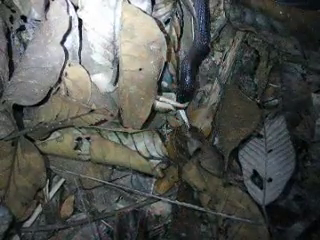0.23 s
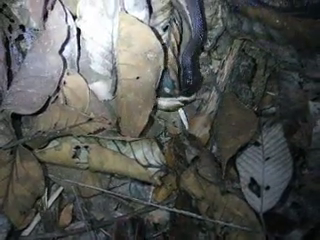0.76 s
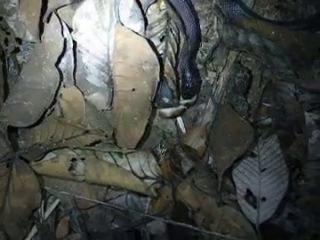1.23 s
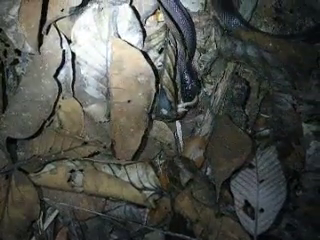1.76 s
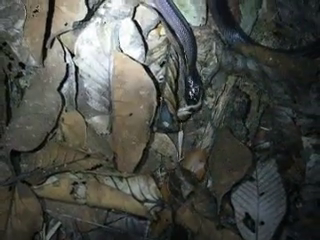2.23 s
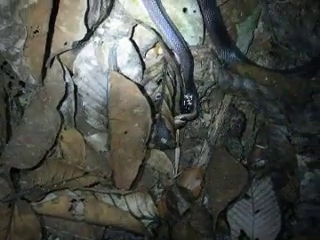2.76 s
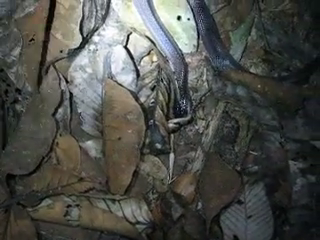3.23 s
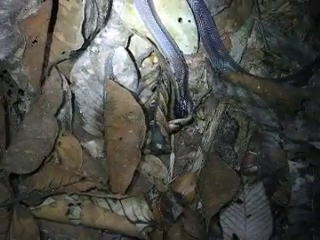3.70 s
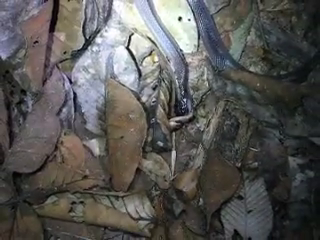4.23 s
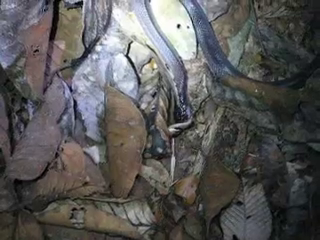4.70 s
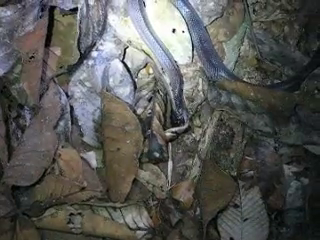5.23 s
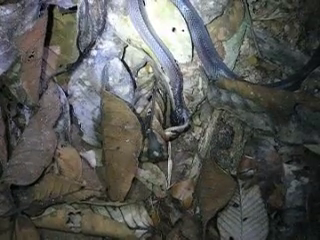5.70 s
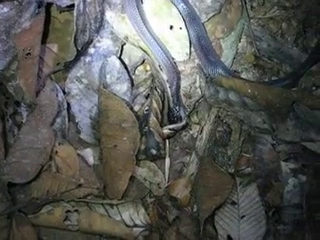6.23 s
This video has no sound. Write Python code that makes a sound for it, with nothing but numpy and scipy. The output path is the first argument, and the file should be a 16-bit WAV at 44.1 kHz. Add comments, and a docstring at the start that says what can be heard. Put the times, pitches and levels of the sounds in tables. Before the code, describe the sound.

Dry leaves crackle and click close by, then settle, under a steady, high chorus of night crickets in a forest.

```python
"""Night in a rainforest, heard from a hand-held camera close to the fallen leaves.
From the start, air hisses, the camera's motor whines on the right and far insects and frogs hum.
Crickets rub their wings: a crowd throbs near 5.9 kHz while others trill in turns near 4.5 kHz.
Dry leaves rustle and snap, mostly on the right, and calm down after three seconds.
Short chirps come now and then from about one second on; near six seconds a katydid starts to rasp."""
import sys
import numpy as np
from scipy import signal
from scipy.fft import rfft, irfft
from scipy.io import wavfile
from scipy.ndimage import uniform_filter1d

SR = 44100
rng = np.random.default_rng(int(sys.argv[2]) if len(sys.argv) > 2 else 0)


def master_out(mix):
    """Clip the mix to full scale and print it as 16-bit PCM to the path in sys.argv[1]."""
    frames = np.transpose(np.atleast_2d(mix))
    ceiling = np.clip(frames, -1, 1)
    pcm = np.round(ceiling * 32767).astype(np.int16)
    wavfile.write(sys.argv[1], SR, pcm)


N = 284743
T = np.arange(N) / SR
FREQS = np.maximum(np.fft.rfftfreq(N, 1 / SR), 1)


def undb(db):
    """Turn decibels into a gain."""
    return 10 ** (np.asarray(db) / 20)


def pan(db):
    """Gains for the two ears, the left one louder by db."""
    return undb(np.array([[db / 2], [-db / 2]]))


def unit(x):
    """Scale a sound to an average (rms) size of 1."""
    return x / np.sqrt(np.mean(np.abs(x) ** 2))


def wander(per_s):
    """A smooth random curve for each ear, about 1 in size."""
    step = int(SR / per_s)
    held = np.repeat(rng.standard_normal((2, N // step + 1)), step, axis=1)
    return unit(uniform_filter1d(uniform_filter1d(held, step), step)[:, :N])


def swell(start_s, end_s, fade_s):
    """A gain that fades in around start_s and out around end_s."""
    inside_s = np.minimum(T - start_s, end_s - T)
    return np.sin(np.pi / 2 * np.clip(inside_s / fade_s + .5, 0, 1)) ** 2


def band(x, low_hz, high_hz):
    """Keep the part of a sound between two pitches."""
    return signal.sosfilt(signal.butter(2, [low_hz, high_hz], "band", fs=SR, output="sos"), x)


def noise(spectrum, likeness):
    """Shaped noise; likeness runs from 0 (the ears are unrelated) to 1 (both hear the same)."""
    mid, side = rfft(rng.standard_normal((2, N))) * spectrum
    mid, side = mid * np.sqrt((1 + likeness) / 2), side * np.sqrt((1 - likeness) / 2)
    return irfft(np.array([mid + side, mid - side]), N)


def noise_around(pitch_hz, width_hz, likeness):
    """Noise gathered around one pitch."""
    spectrum = 1 / (1 + (2 * (FREQS - pitch_hz) / width_hz) ** 4) ** .67
    return unit(noise(spectrum, likeness))


def air():
    """Still air and the microphones hiss over a low, wavering murmur."""
    # tone of the hiss: pitch_hz, level_db (per Hz), likeness
    hiss_tone = [(20, -115, 0), (60.6, -104, 0.26), (141, -99, 0.08), (400, -97.5, 0.3), (790, -95, 0.78),
                 (1520, -101, 0.3), (2460, -101, 0.22), (3530, -95, 0.08), (4800, -85, 0), (6420, -94.5, 0),
                 (7400, -103, 1), (9940, -107, 0), (13300, -110, 0.1), (16000, -120, 0.1)]
    # loudness of the murmur: time_s, level_db
    murmur_levels = [(0.0, -71), (0.21, -74), (1.33, -68), (2.27, -73.5), (3.9, -71), (4.13, -73),
                     (6.28, -73), (6.46, -72)]
    hz, db, likeness = np.transpose(hiss_tone)
    spectrum = undb(np.interp(np.log(FREQS), np.log(hz), db)) * np.sqrt(SR / 2)
    hiss = noise(spectrum, np.interp(np.log(FREQS), np.log(hz), likeness))
    hiss *= undb(1.44 * wander(per_s=5.05)[0])
    murmur_db = np.interp(T, *np.transpose(murmur_levels)) + 2.5 * wander(per_s=5)[0]
    return hiss + undb(murmur_db) * noise_around(320, width_hz=336, likeness=.87)


def motor_whine(pitch_hz=8263, restarts_per_s=30, first_restart_s=.0012, left_db=-75, right_db=-57.5):
    """The camera motor's tone keeps starting afresh; the casing dulls what lies above it."""
    since_restart_s = (T - first_restart_s) % (1 / restarts_per_s)
    tone = np.sin(2 * np.pi * pitch_hz * since_restart_s)
    return unit(band(tone, 7900, 8270)) * undb([[left_db], [right_db]])


def far_chorus():
    """Far insects and frogs blur into bands of noise that swell slowly and flicker."""
    # singers that never stop: pitch_hz, width_hz, level_db, left_minus_right_db, likeness
    steady_singers = [(443.3, 35, -78.5, -7, 0.9), (703, 32, -76, -5, 0.05), (968.3, 84, -69.5, 6, 0.73),
                      (1583, 127, -75, 0, 0.4), (1910, 32, -83, -7, 0), (3331, 21, -73, -12, 0),
                      (4130, 260, -59, -1.5, 0), (4540, 320, -56.5, 1, 0), (5587, 360, -57, 6, 0),
                      (5914, 230, -50.5, 1, 0), (6363, 430, -58.5, 1, 0), (7900, 22, -72.5, 9.5, 0)]
    # faint singers that come and go: start_s, length_s, pitch_hz, width_hz, level_db
    passing_singers = [(.05, .85, 12700, 900, -76), (3.3, .35, 1930, 30, -82), (5.9, .7, 2000, 250, -77),
                       (6.0, .6, 450, 30, -77), (3.3, .6, 1590, 70, -80), (2.1, .6, 5400, 120, -67),
                       (4.5, .6, 5380, 120, -67), (5.6, 1.0, 1590, 70, -80)]
    out = 0
    for hz, width_hz, db, pan_db, likeness in steady_singers:
        waver_db = .9 * wander(per_s=1.5)[0] + 1.2 * wander(per_s=9)[0]
        out += noise_around(hz, width_hz, likeness) * pan(pan_db) * undb(db + waver_db)
    for start_s, length_s, hz, width_hz, db in passing_singers:
        gain = undb(db) * swell(start_s, start_s + length_s, fade_s=.12)
        out += gain * noise_around(hz, width_hz, likeness=1)
    return out


def wing_tone(hz, strokes_per_s, stroke_at_s, sharpness, scatter, fades_per_s,
              bend_rad=.3, ear_shift_rad=np.pi / 2):
    """A cricket's tone pulses with each wing stroke; leaves scatter it, so each ear fades on its own."""
    stroke = 2 * np.pi * strokes_per_s * (T - stroke_at_s)
    phase = 2 * np.pi * hz * T + bend_rad * np.sin(stroke)
    tone = np.exp(sharpness * np.cos(stroke) + 1j * phase)
    direct = np.exp(1j * np.array([[0], [ear_shift_rad]]))  # the wave meets the two ears out of step
    scattered = scatter * (wander(fades_per_s) + 1j * wander(fades_per_s))
    return unit((tone * (direct + scattered)).real)


def throbbing_crickets(count=20, throbs_per_s=14.84, near_hz=5880, crowd_hz=5950):
    """One near cricket and a crowd of the same kind, each with its own pitch and timing."""
    # loudness of the near cricket: time_s, level_db
    near_levels = [(0, -59), (.6, -54), (1.4, -55), (2.0, -51), (2.5, -48), (2.9, -50), (3.4, -52),
                   (4.0, -58), (4.8, -58), (5.6, -56), (6.46, -57)]
    # loudness of the crowd: time_s, level_db
    crowd_levels = [(0.0, -47), (1.7, -47.5), (2.27, -45.5), (2.9, -47), (3.1, -49), (4.41, -51),
                    (4.73, -47.5), (6.46, -47.5)]
    near = wing_tone(near_hz, throbs_per_s, stroke_at_s=.0593, sharpness=1.1, scatter=.5, fades_per_s=20)
    near *= undb(np.interp(T, *np.transpose(near_levels))) * pan(8.8)
    spread = np.linspace(-1, 1, count)
    pitches_hz = crowd_hz + 170 * spread + 6 * rng.standard_normal(count)
    gains = undb(-7 * spread ** 2)  # quieter away from the common pitch
    rates = throbs_per_s * (1 + .0398 * rng.standard_normal(count))
    crowd = sum(gain * wing_tone(hz, rate, rng.random(), sharpness=.6, scatter=.9, fades_per_s=35)
                for gain, hz, rate in zip(gains, pitches_hz, rates))
    return near + undb(np.interp(T, *np.transpose(crowd_levels))) * pan(1.4) * unit(crowd)


def trilling_crickets(pulses_per_s=3.514, first_pulse_s=.224):
    """Six crickets trill with fast wing strokes: four sing in phrases, two never stop."""
    # a row per cricket: pitch_hz, strokes_per_s, sharpness, bend_rad, left_minus_right_db, ear_shift_rad
    crickets = [(4570, 121, 1.5, -.35, .5, .5), (4646, 118.5, 1.0, .1, 1.5, 1.2),
                (4656, 120, 1.2, -.3, 1, .5), (4492, 120, 1.5, -.8, 1, 1.2), (4041, 102, 2.5, -.2, 2, 1.4),
                (3425, 118.5, 2.2, .4, 1.5, 1.4)]
    # phrases of the first four, a list each: start_s, length_s, level_db, growth_db
    phrase_lists = [
        [(-.4, 0.52, -56.5, 1), (1.33, 0.62, -51.5, 2), (3.27, .66, -53.5, -5.5), (5.19, 0.7, -53.5, -3.5)],
        [(-.3, .66, -64, 2), (1.53, 0.57, -51.5, -8), (3.53, 0.5, -52, 9), (5.57, 0.71, -56.5, -2)],
        [(.47, 0.58, -54, -5), (2.94, .72, -61.5, -8), (4.77, 0.49, -58.5, -4)],
        [(-.05, 0.45, -63, 2), (1.73, 0.62, -60, -2), (3.93, 0.8, -57.5, -10), (6.13, .7, -60, -3)],
    ]
    # loudness of the last two: time_s, fifth_db, sixth_db
    nonstop_levels = [(0, -64, -65), (1.0, -65, -63), (2.0, -59, -65), (2.6, -57, -68.5), (3.2, -63, -63.5),
                      (4.2, -66, -69), (5.0, -61.5, -70.5), (6.46, -64, -66.5)]
    gains = np.zeros((len(crickets), N))
    for gain, phrases in zip(gains, phrase_lists):
        for start_s, length_s, db, growth_db in phrases:
            from_middle = np.clip((T - start_s) / length_s - .5, -.5, .5)
            gain += undb(db + growth_db * from_middle) * swell(start_s, start_s + length_s, fade_s=.2)
    time_s, fifth_db, sixth_db = np.transpose(nonstop_levels)
    pulses = unit(np.exp(.4 * np.cos(2 * np.pi * pulses_per_s * (T - first_pulse_s))))
    gains[4] = undb(np.interp(T, time_s, fifth_db)) * pulses
    gains[5] = undb(np.interp(T, time_s, sixth_db))
    out = 0
    for (hz, rate, sharpness, bend_rad, pan_db, ear_shift_rad), gain in zip(crickets, gains):
        trill = wing_tone(hz, rate, rng.random(), sharpness, scatter=.2, fades_per_s=5,
                          bend_rad=bend_rad, ear_shift_rad=ear_shift_rad)
        out += gain * pan(pan_db) * trill
    return out


def leaf_rustle(cracks_per_s=2500):
    """Rubbing leaves make countless tiny cracks; brief scuffs swell and die away on top."""
    # steady rubbing: time_s, bright_db, dull_minus_bright_db
    rubbing = [(0, -68.5, -1.5), (.7, -67, 4), (1.1, -70, 5.5), (1.5, -72, 7), (1.9, -67.5, 3),
               (2.4, -70.5, 1.5), (2.7, -71, -1), (3.1, -77, 4), (4.2, -77.5, 8.5), (5.2, -72.5, -9),
               (5.75, -75.5, 9), (6.46, -74, 4)]
    # scuffs through the leaves: peak_s, bright_db, dull_minus_bright_db, width_ms
    scuffs = [(.02, -63, 8, 5.3), (.09, -60.5, 4, 28), (.23, -62, 15, 7.7), (.29, -61.5, 1, 58),
              (0.489, -69, 15, 6.6), (.642, -56, -4, 8), (0.901, -52.5, 7.5, 20), (1.1, -68, 7, 14),
              (1.379, -54, 9, 25), (1.758, -48.5, 7, 7.6), (1.98, -57.5, 4, 20), (2.12, -67, -1.5, 25),
              (2.26, -62.5, -1, 64), (2.43, -63, -4, 30), (2.5, -57, -2, 18), (2.706, -53, -6, 17),
              (2.995, -50.5, -9, 29), (3.97, -64.5, 0.5, 140)]
    time_s, db, dull_db = np.transpose(rubbing)
    bright_gain = undb(np.interp(T, time_s, db))
    dull_gain = undb(np.interp(T, time_s, db + dull_db))
    for peak_s, db, dull_db, width_ms in scuffs:
        scuff = undb(db) * np.exp(-1.6 * np.abs(T - peak_s) * 1000 / width_ms)
        bright_gain = np.hypot(bright_gain, scuff)
        dull_gain = np.hypot(dull_gain, scuff * undb(dull_db))
    cracks = rng.random((3, N)) < cracks_per_s / SR  # three streams: middle, left, right
    sizes = undb(2.4 * np.minimum(rng.exponential(size=(3, N)), 4))
    middle, left, right = cracks * sizes * rng.choice([-1, 1], (3, N))
    sides = np.array([left, right])
    wide = .5 * middle + sides
    bright = band(wide, 7100, 13300) + .61 * band(wide, 11300, 12400)
    dull = band(middle + .4 * sides, 1100, 3600)
    return unit(bright) * bright_gain * pan(3.9) + unit(dull) * dull_gain * pan(-2.5)


def faint_snaps(count=16, until_s=2.4):
    """Extra rows for leaf_snaps: small snaps at chance moments while the leaves are busy."""
    when, size, pitch, mid, bright = rng.random((count, 5)).T
    return np.transpose([until_s * when, -57 + 15 * size, 1300 + 1900 * pitch,
                         12 * mid, 10 * bright - 6, np.full(count, -2.5)])


def leaf_snaps(samples=2048, rise_ms=.65, decay_ms=1.16, tail_ms=12):
    """A dry leaf snaps: a burst of noise rises and dies fast, rings the leaf and cracks up high."""
    # snaps: start_s, level_db, ring_hz, mid_boost_db, bright_boost_db, left_minus_right_db
    snaps = [(0.0064, -36, 1140, 2, 13, -4), (0.086, -44.5, 1100, -5, 7, -2.5),
             (0.13, -33.5, 1960, 6, 1, -4.5), (0.1713, -45, 3180, -5, 5, -4),
             (0.2303, -26.5, 3300, 2.5, -4, -4.5), (0.2326, -31.5, 1950, 0, -1, -7),
             (0.2379, -38, 2030, 0, -14, -4), (0.259, -47, 2050, -3, -9, -7),
             (0.2723, -45, 2070, 14, 7, -11), (0.277, -45, 3220, 7, 4, -4), (0.3195, -41, 2860, -5, 4, -8),
             (0.4799, -33.5, 2900, -13, -1, -6.5), (0.5266, -47, 3220, 0, 2, -3.5),
             (0.566, -43.5, 3100, -2, 2, -5), (0.6398, -44, 1290, -1, 9, -1.5),
             (0.6886, -42, 1300, -11, -1, -2.5), (0.792, -40, 2230, -3, 6.5, -4.5),
             (0.818, -37.5, 3300, 6, 1.5, -6), (0.8645, -45, 1250, 12.5, -4, -3.5),
             (0.8966, -40.5, 3000, 11, 11, -7), (0.9072, -44.5, 2900, 13.5, 16.5, -4),
             (0.9133, -47, 2500, 9, 9, -4), (0.938, -44, 2240, 2, 8, -2.5),
             (0.948, -49, 1700, 11, 14, -1.5), (1.0, -45.5, 1430, -1, -6, -2),
             (1.0472, -47, 1270, -2, -6, -2.5), (1.0964, -35.5, 1960, 5.5, -2, -5),
             (1.15, -41, 2480, -10, -16, -6), (1.1954, -39, 1330, 4.5, 0, -3.5),
             (1.2362, -40, 2260, -11, -3, -3.5), (1.278, -40, 2400, -2, -1, -5),
             (1.315, -41.5, 3280, 7, -1, -3), (1.367, -37, 2440, 1, 1, -4), (1.3867, -35.5, 2750, 4, 9, -7),
             (1.459, -47.5, 2350, 5, 4, -4.5), (1.61, -50, 3070, 12, 11, 0),
             (1.7114, -50, 1600, 9, 12, -1.5), (1.7536, -28.5, 2530, 6, 4.5, -5.5),
             (1.774, -41, 3150, -8, 3, -4), (1.796, -36.5, 3140, -12, -1, -5),
             (1.8123, -47, 3020, 1, 6, -3), (1.961, -44, 2880, 2, 8, -4.5), (1.9822, -40, 2340, 4, 5, -4),
             (2.101, -42.5, 1360, 6, 6, -4), (2.115, -55, 1520, 5, 19, -2.5),
             (2.2546, -51.5, 1520, 8, 14, -2.5), (2.4099, -44, 2400, -5, -5, -5),
             (2.431, -50.5, 2580, 3, 16, -3), (2.547, -47.5, 1250, 7, 0, -1.5),
             (2.71, -45, 2950, -6, 6, -11), (2.7705, -62, 2940, 2, 22, -1.5),
             (2.9928, -44, 1030, -11, -6, 6), (2.998, -43, 990, -4, 8, 6), (3.494, -51, 1540, -1, -5, -2.5),
             (3.9168, -44.5, 1970, 5, 2, -9), (5.069, -49, 1660, -8, -12, -6)]
    out = np.zeros((2, N + samples))
    ms = np.arange(samples) / SR * 1000
    rise = 1 - np.exp(-(ms / rise_ms) ** 2)
    burst = rise * (np.exp(-ms / decay_ms) + .06 * np.exp(-ms / tail_ms))
    for start_s, db, ring_hz, mid_db, bright_db, pan_db in snaps + list(faint_snaps()):
        start = int(start_s * SR)
        # ring, thud, body, then the mid, bright and top parts of the crack
        parts = [(.88 * ring_hz, 1.12 * ring_hz, -3.5), (500, 1200, -15.5), (1300, 3300, -4),
                 (3300, 6200, mid_db), (6300, 7900, bright_db), (9000, 15000, bright_db - 18)]
        for low_hz, high_hz, boost_db in parts:
            part = band(burst * rng.standard_normal(samples), low_hz, high_hz)
            out[:, start:start + samples] += pan(pan_db) * undb(db + boost_db) * part / np.abs(part).max()
    return out[:, :N]


def short_chirps(strokes_per_s=42):
    """Brief wing tones, made rough by slow strokes."""
    # chirps: start_s, length_s, pitch_hz, level_db
    chirps = [(0.94, 0.13, 4150, -55), (1.206, 0.27, 4180, -55.5), (1.45, 0.29, 4210, -58),
              (1.884, 0.17, 4100, -52), (2.129, 0.14, 4060, -52.5), (2.377, 0.14, 4000, -53),
              (2.33, 0.087, 4250, -61), (2.562, 0.069, 4310, -56), (2.798, 0.072, 4370, -53),
              (5.333, 0.15, 4190, -54.5), (5.54, 0.19, 4200, -52.5), (5.855, .06, 4040, -58),
              (6.12, 0.14, 4090, -54.5)]
    out = 0
    for start_s, length_s, hz, db in chirps:
        tone = wing_tone(hz, strokes_per_s, start_s, sharpness=.5, scatter=.5, fades_per_s=45)
        chirp = swell(start_s, start_s + length_s, fade_s=.04) * tone
        out += undb(db) * unit(chirp) * np.sqrt(length_s * SR / N)  # level over the chirp's own length
    return out


def katydid(start_s=5.95, level_db=-67.5, rasp_per_s=450, pulses_per_s=45):
    """A katydid's high rasp swells in, climbs in pitch and sags again."""
    # path of the pitch: time_s, pitch_hz
    pitches = [(5.85, 13100), (6.2, 13530), (6.46, 13400)]
    phase = 2 * np.pi * np.cumsum(np.interp(T, *np.transpose(pitches))) / SR
    roughness = wander(rasp_per_s) + 1j * wander(rasp_per_s)
    pulses = undb(3 * np.cos(2 * np.pi * pulses_per_s * T))
    rasp = unit((roughness * pulses * np.exp(1j * phase)).real)
    return rasp * undb(level_db) * swell(start_s, np.inf, fade_s=.33) * pan(4.1)


def scene():
    """All the sounds as they reach the two microphones."""
    background = air() + motor_whine() + far_chorus()
    crickets = throbbing_crickets() + trilling_crickets()
    leaves = leaf_rustle() + leaf_snaps()
    return background + crickets + leaves + short_chirps() + katydid()


def record(dry, top_hz=15800):
    """The camera cuts off the very highest sounds."""
    return signal.sosfilt(signal.ellip(10, .2, 60, top_hz, fs=SR, output="sos"), dry)


dry = scene()
out = record(dry)
master_out(out)
```